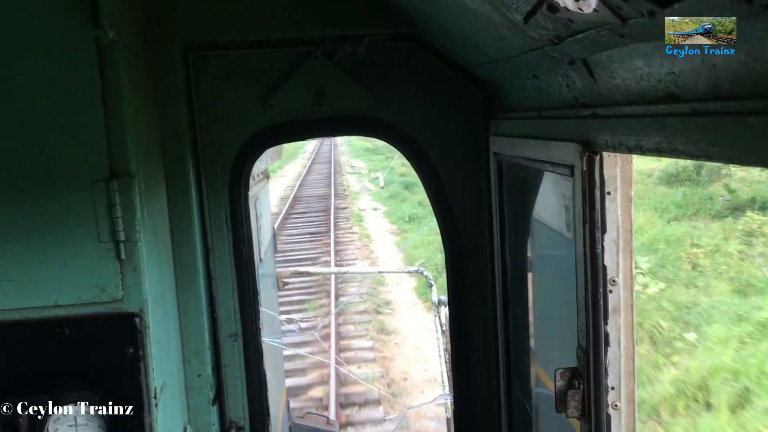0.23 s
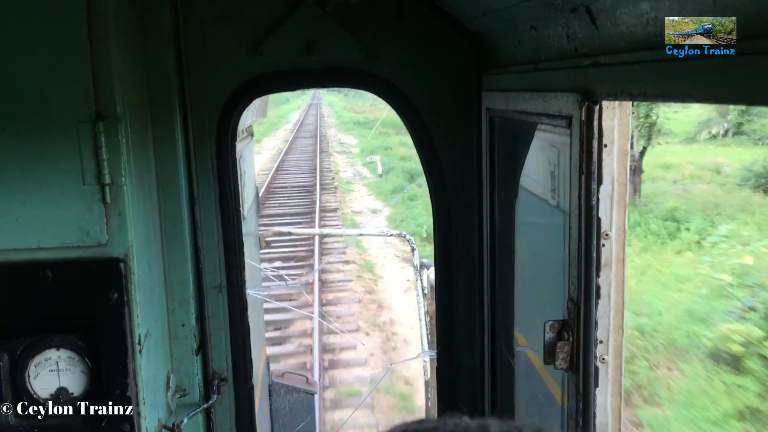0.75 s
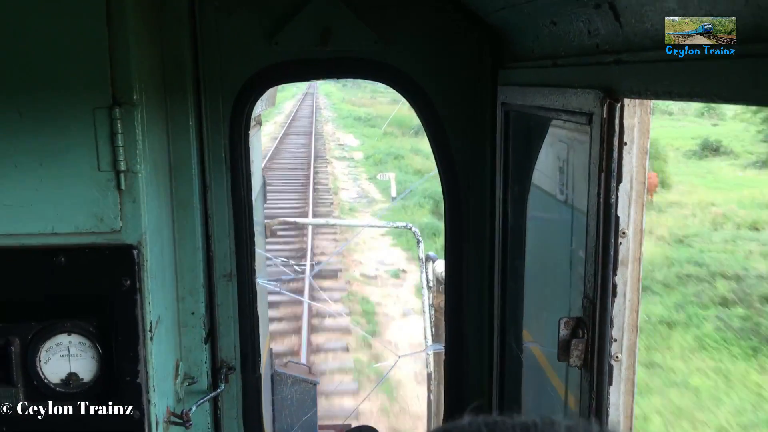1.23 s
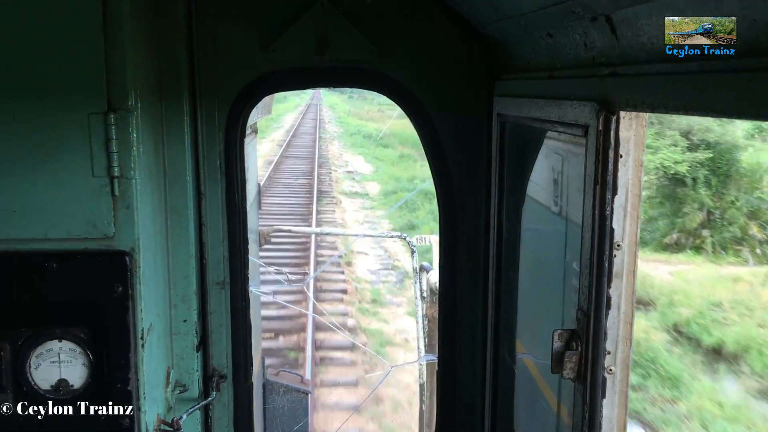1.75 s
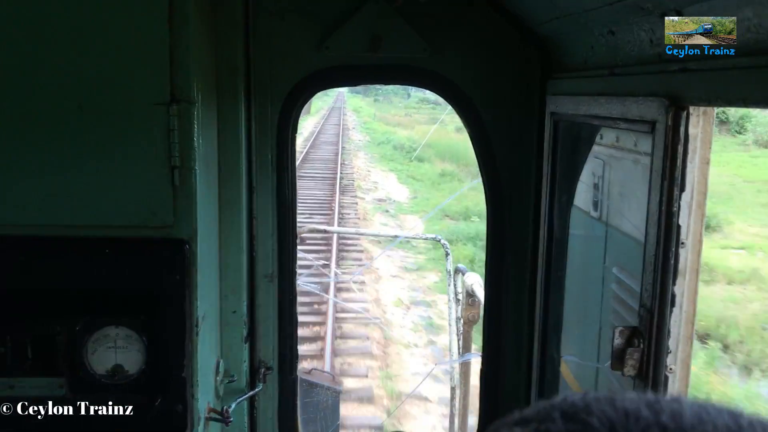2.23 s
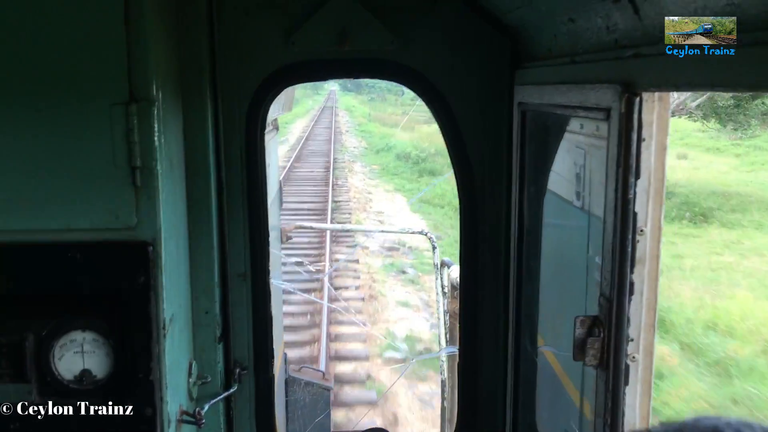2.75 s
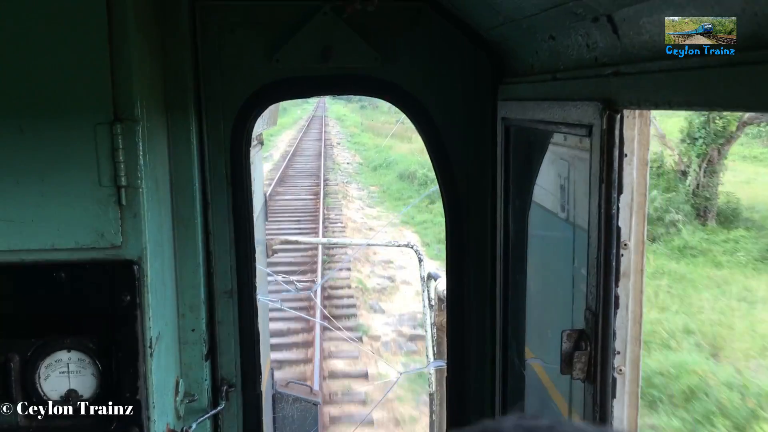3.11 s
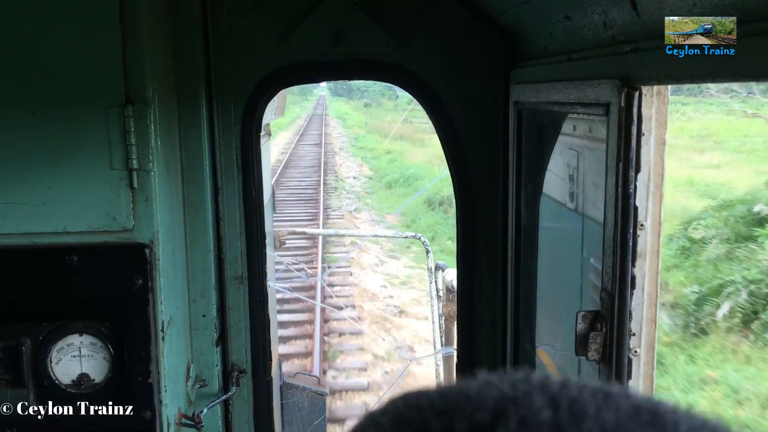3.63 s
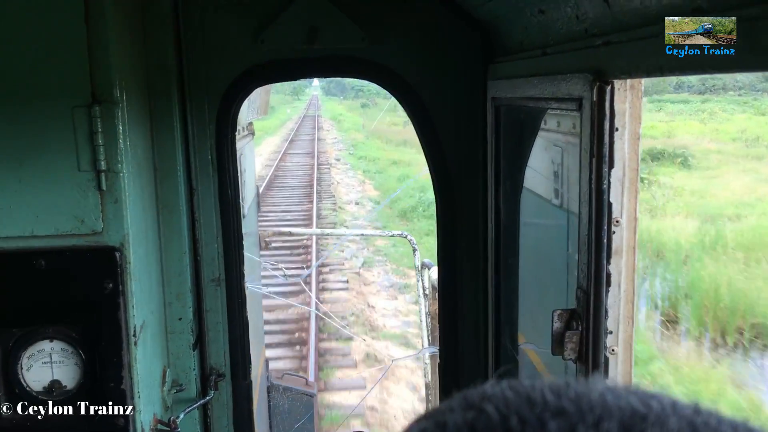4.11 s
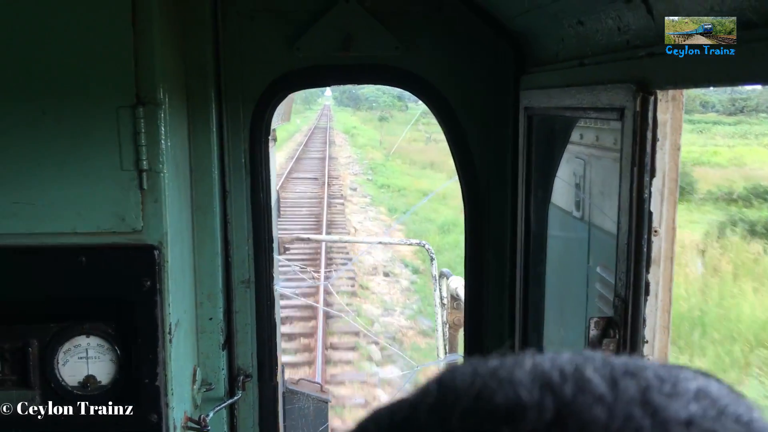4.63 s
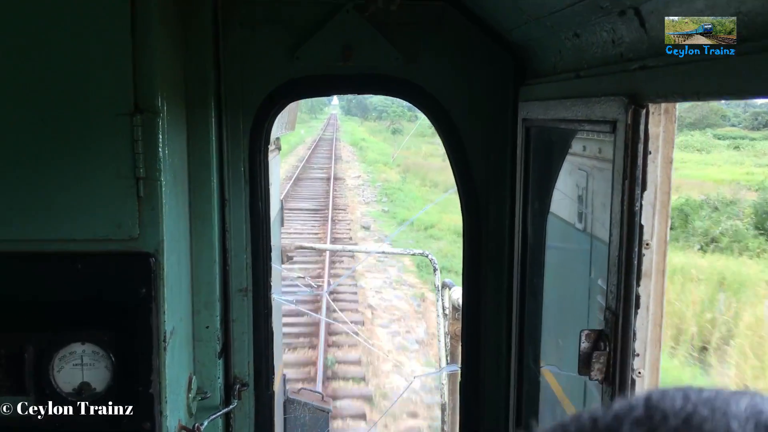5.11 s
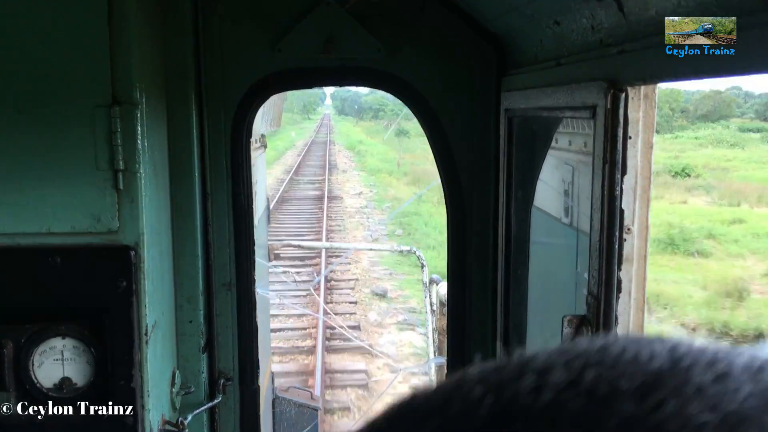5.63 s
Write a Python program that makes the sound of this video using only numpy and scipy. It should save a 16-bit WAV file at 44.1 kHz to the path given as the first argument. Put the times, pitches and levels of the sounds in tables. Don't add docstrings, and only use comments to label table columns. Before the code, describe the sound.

A continuous six-second ride inside the steel cab of a diesel-electric locomotive, heard close by with the door open. The engine holds a steady throttle, a deep throbbing drone with about ten pulses per second, mixed with a low alternator hum and thin, wavering gear whine. Under it lies a dense roar of air, rolling wheels and shaking steel, with a floor panel booming softly. Loose metal fittings jingle and rattle without pause, bright and dry, with sharper clinks scattered throughout, such as near 1.6, 3.3 and 4.0 seconds. Axles knock over rail joints in quick clusters of two or three around 0.4, 1.3, 2.2, 3.1, 3.9, 4.8 and 5.7 seconds, some with a short steely ring and, especially later, a dull floor thud. Small ticks from the cab body appear occasionally, clearest near 4.8 seconds. The speed stays constant and the sound ends mid-ride.

```python
import sys
import numpy as np
from scipy import signal
from scipy.fft import rfft, irfft
from scipy.io import wavfile
from scipy.ndimage import uniform_filter1d

SR = 44100
rng = np.random.default_rng(int(sys.argv[2]) if len(sys.argv) > 2 else 0)


def to_linear_factor(level_db):
    exponent = np.asarray(level_db, float) / 20
    return 10 ** exponent


def transcribe(signal):
    frames = np.atleast_2d(signal).T
    limited = np.clip(frames, -1, 1)
    pcm = np.round(limited * 32767).astype(np.int16)
    wavfile.write(sys.argv[1], SR, pcm)


N = 258426
T = np.arange(N) / SR
HZ = np.fft.rfftfreq(N, 1 / SR)
CRANK_HZ = 9.8811

THROB_DB = [-60, -44, -35.3, -33.8, -40.6, -31, -22.4, -38.2, -32.8, -64, -53, -49.5, -39, -52, -53, -56,
            -53, -52]
# (frequency [Hz], level of one order [dB rms])
CLATTER_COLOUR = [(200, -68.5), (350, -62), (450, -68), (600, -68), (800, -69), (1100, -79.5), (1600, -102)]
FLOOR_ORDERS = (3, 4, 6, 7, 16, 18, 20)
DOOR_ORDERS = (4, 5, 15)

# (multiple of its tone), (level [dB rms])
ALTERNATOR_MULTIPLES = (1, 2, 3, 5, 13, 16, 17, 18)
ALTERNATOR_DB = [-35.6, -34, -48.8, -53, -57, -62, -66, -64]
# (teeth met [per crank turn]), (level [dB rms])
GEAR_TEETH = (30, 39, 78, 79, 80, 81, 83, 113, 158, 218, 334)
GEAR_DB = [-53, -52.5, -63, -54, -62, -66, -64, -68, -59, -63, -70]
# (time [s], level [dB])
BLOWER_LOAD = [(0, -48.5), (.5, -46.5), (.9, -49.5), (1.75, -47.5), (2.2, -54), (2.75, -48.5), (3.6, -51.5),
               (4.3, -49), (4.85, -54.5), (5.25, -50.5), (5.86, -51)]

# (frequency [Hz], level [dB per Hz])
JINGLE_COLOUR = [(2000, -9), (3000, -8.5), (3400, -2.5), (4100, -11.5), (5350, -4), (6050, -4), (6700, 3),
                 (7500, -5.5), (9600, -0.5), (10550, -5), (11500, -3), (13200, -4.5), (14000, -8),
                 (15700, -12)]
# (frequency [Hz], width [Hz], level [dB])
FITTING_RINGS = [(5270, 1100, -7.5), (6680, 140, 0), (7950, 530, -3), (9540, 300, -0.5), (11350, 3100, -10)]
# (time [s], level [dB])
SHAKING = [(0.0, -46.5), (0.11, -45), (0.33, -45), (1.29, -44.5), (2.07, -46), (3.05, -45.5), (3.46, -43.5),
           (4.18, -44.5), (5.11, -44), (5.58, -46), (5.86, -43)]
# (time [s], peak [dB], lower rings relative to it [dB])
FITTING_HITS = [(0.041, -27.5, -19), (0.4071, -28, -13), (0.4788, -27.5, -13), (0.528, -25.5, -13),
                (0.6197, -28, -12), (0.9892, -29, -9), (1.0803, -29.5, -9), (1.509, -25.5, -14),
                (1.6003, -25, -9.5), (1.8083, -28.5, -8), (1.8941, -28, -16), (1.9765, -26, -12),
                (2.7357, -26, -11), (2.8792, -26.5, -12), (2.9895, -31, -9), (3.0612, -25, -15),
                (3.1403, -28, -13), (3.2799, -28, -17), (3.3398, -24, -12), (3.6007, -28, -18),
                (3.6603, -29, -15), (3.926, -26, -17), (4.0082, -25, -18), (4.2594, -32, -10),
                (4.4573, -25.5, -18), (4.6048, -27, -14), (4.789, -30, -19), (4.9871, -26, -13),
                (5.2347, -31, -12), (5.838, -29, -13)]

# (time [s], peak [dB], ring [Hz], ring relative to peak [dB], thud [dB])
WHEEL_KNOCKS = [(0.409, -32, 1043, -7, -37), (0.5003, -33, 934, -13, -40), (0.6, -36, 1220, -2, -46),
                (1.29, -34, 1150, -16, -29), (1.3994, -38, 1320, -10, -36), (2.171, -27, 1190, -9, -39),
                (2.2794, -34, 1166, -10, -44), (3.051, -26.5, 950, -6, -27), (3.153, -28.5, 1070, -9, -24),
                (3.256, -32, 1020, -4, -40), (3.9296, -28.5, 1352, -3.5, -23),
                (4.0329, -29.5, 990, -3, -22), (4.132, -33.5, 1315, -8, -31),
                (4.8146, -29.5, 1286, 4, -18.5), (4.9194, -36, 1010, -10, -40),
                (5.019, -34.5, 1000, -11, -31), (5.688, -30, 1304, -2, -19), (5.7894, -37, 1130, -12, -22)]
# (time [s], peak [dB])
BODY_TICKS = [
    (0.806, -35),
    (1.6194, -38),
    (2.9647, -36),
    (3.603, -36),
    (4.5803, -33),
    (4.6259, -33),
    (4.761, -26),
    (5.376, -32),
]

# (frequency [Hz], level [dB per Hz])
ROAR_COLOUR = [(15, -77), (30, -70), (44, -52), (90, -51), (130, -53), (200, -61), (340, -60), (450, -68.5),
               (600, -67), (900, -79), (1350, -79), (2000, -81.5), (2800, -88.5), (4200, -93.5)]
# (time [s], level [dB])
RAIL_ROUGHNESS = [(0.0, -36.5), (0.29, -37), (1.19, -36.5), (1.31, -35), (1.84, -36.5), (2.1, -36.5),
                  (2.84, -37.5), (3.2, -37), (3.53, -36.5), (3.88, -37), (4.49, -37.5), (4.78, -35.5),
                  (5.26, -37.5), (5.86, -37)]


def unit(x):
    return x / np.sqrt(np.mean(x ** 2))


def shape(x, gain):
    return irfft(rfft(x) * gain, N)


def noise():
    return rng.standard_normal(N)


def colour(points, hz=HZ + 1):
    at, db = np.transpose(points)
    return to_linear_factor(np.interp(np.log(hz), np.log(at), db, left=-200))


def bell(hz, width_hz):
    return 1 / np.sqrt(1 + (2 * (HZ - hz) / width_hz) ** 2)


def walk(rate):
    hold = int(SR / rate)
    steps = np.repeat(rng.standard_normal(N // hold + 1), hold)
    return unit(uniform_filter1d(uniform_filter1d(steps, hold), hold)[:N])


def curve(table):
    at, level = np.transpose(table)
    return np.interp(T, at, level)


def tone(angle, db, sway_db, slip, rate):
    level = np.sqrt(2) * to_linear_factor(db + sway_db * walk(rate))
    return level * np.cos(angle + slip * walk(rate))


def bursts(times, db, t60, rise):
    power = np.zeros(N)
    at = np.clip((np.asarray(times) * SR).astype(int), 0, N - 1)
    np.add.at(power, at, to_linear_factor(db) ** 2)
    power = signal.lfilter([1], [1, -np.exp(-2 * np.log(1000) / (t60 * SR))], power)
    soft = np.exp(-1 / (rise * SR))
    return np.sqrt(signal.lfilter([1 - soft], [1, -soft], power))


def add(out, s, blow):
    start = int(s * SR)
    out[start:start + len(blow)] += blow


def engine():
    wall_lag, floor_lead, door_lead = -2.64, 2.6, .85
    turn = 2 * np.pi * CRANK_HZ * T
    throb = np.zeros(N)
    for k, db in enumerate(THROB_DB, start=3):
        path = wall_lag + floor_lead * (k in FLOOR_ORDERS) + door_lead * (k in DOOR_ORDERS)
        throb += tone(k * (turn + np.pi) + path, db, .4, .05, 4)

    orders = np.arange(21, 160)
    one_turn = np.arange(4096) / 4096
    chance = to_linear_factor(2.5 * rng.standard_normal(len(orders)))
    size = np.sqrt(2) * colour(CLATTER_COLOUR, orders * CRANK_HZ) * chance
    phase = rng.random((len(orders), 1))
    pattern = size @ np.cos(2 * np.pi * (orders[:, None] * one_turn + phase))
    place = CRANK_HZ * T + 0.0016 * walk(3.035)
    return throb + np.interp(place % 1, one_turn, pattern, period=1)


def whines():
    alternator_hz, motor_hz, blower_teeth = 58.54, 92.82, 138
    turn = 2 * np.pi * T
    out = tone(turn * blower_teeth * CRANK_HZ, curve(BLOWER_LOAD), 0.93, 0.36, 14)
    out += tone(turn * motor_hz, -45.5, 1.9, 0.17, 3.3)
    for k, db in zip(ALTERNATOR_MULTIPLES, ALTERNATOR_DB):
        out += tone(turn * k * alternator_hz - .6, db, .3 + .15 * k, .06 * k, 8)
    for k, db in zip(GEAR_TEETH, GEAR_DB):
        out += tone(turn * k * CRANK_HZ, db, 1.5, .1 + 3e-5 * k ** 2, 18)
    return out


def rattle(shake_db):
    beat_s = 1 / (5.55 * CRANK_HZ)
    wheel_hz, wheel_lag, wheel_db = 2.92, 3.0, 1.5
    hits = np.transpose(FITTING_HITS) + np.array([[0], [3], [0]])
    rebounds = hits + np.array([[beat_s], [-10], [0]])
    marks = np.concatenate([[0], hits[0], [T[-1]]])
    count = np.cumsum(np.append(0, np.round(np.diff(marks) / beat_s)))
    s = np.interp(np.setdiff1d(np.arange(count[-1]), count), count, marks)

    chance = rng.random((400, 3))[:len(s)].T
    db = shake_db[(s * SR).astype(int)] + 18 - 9 * chance[0]
    db += wheel_db * np.cos(2 * np.pi * wheel_hz * s - wheel_lag)
    s = s + .002 * (2 * chance[1] - 1)
    low_db = -12 + 6.6 * (chance[2] - .5)
    return np.hstack([[s, db, low_db], hits, rebounds])


def fittings():
    out, colours = np.zeros(N), colour(JINGLE_COLOUR)
    small_s = rng.random(900) * N / SR
    shake_db = curve(SHAKING)
    s, hit_db, low_db = rattle(shake_db)
    small_db = shake_db[(small_s * SR).astype(int)] + 6.8 * rng.random(len(small_s))

    # gain, centre (Hz), time to die away (s)
    parts = []
    for hz in range(2500, 16000, 1000):
        band = np.cos(np.pi * np.clip((HZ - hz) / 2000, -.5, .5))
        parts.append((colours * band, hz, .019))
    for hz, width, db in FITTING_RINGS:
        parts.append((to_linear_factor(db + 2.5) * bell(hz, width) ** 2, hz, .04))
    scale = to_linear_factor(0.67) / np.sqrt(np.mean(colours ** 2))

    for gain, hz, t60 in parts:
        reach_db = -6.0 * (hz > 13600) - 2.9 * (hz < 4800)
        big = hit_db + (hz < 8500) * (low_db + 8) - 2.0 - 14.4 * rng.random(len(s))
        small = small_db - 10.5 * rng.random(len(small_s))
        blows = bursts(np.append(s, small_s), np.append(big, small) + reach_db, t60, .002)
        hiss = to_linear_factor(shake_db - 6)
        out += np.sqrt(hiss ** 2 + blows ** 2) * shape(noise(), scale * gain)
    return out


def track():
    out, t = np.zeros(N + SR), T[:SR // 4]
    resonances = bell(1100, 1700) ** 2 + to_linear_factor(-19) * bell(2800, 2500) ** 2
    steel = shape(noise(), resonances * np.clip(HZ / 400, 0, 1) ** 2)
    steel = np.resize(unit(steel) * to_linear_factor(2.2 * walk(140)), N + SR)
    tail = to_linear_factor(-5.5) * np.exp(-np.log(1000) * t / 0.27) + to_linear_factor(-11) * np.exp(-t / .006)
    onset = 1 - np.exp(-t / .002)
    for s, db, ring_hz, ring_db, _ in WHEEL_KNOCKS:
        crack = steel[int(s * SR):][:len(t)] * tail * onset * to_linear_factor(1 - .1 * (ring_db + 8))
        swell = t / 0.0095 * np.exp(1 - t / 0.0081)
        ring = to_linear_factor(ring_db) * np.sin(2 * np.pi * ring_hz * t) * swell
        add(out, s, to_linear_factor(db - 6.0) * (crack + ring))

    push = t / 0.00096
    tick = np.sin(2 * np.pi * 1230 * t) * push ** 2 * np.exp(2 - 2 * push)
    for s, db in BODY_TICKS:
        add(out, s, to_linear_factor(db) * tick)

    s, thud_db = np.transpose(WHEEL_KNOCKS)[[0, 4]]
    floor = unit(shape(noise(), bell(310, 130) ** 2))
    return out[:N] + bursts(s, thud_db - 9.0, 0.13, .007) * floor


def roar():
    out, shared = np.zeros(N), walk(22.03)
    rail = curve(RAIL_ROUGHNESS)
    swell = rail - np.mean(rail)
    boom = 3.9 * swell + 1.63 * walk(14)
    pump = .8 * np.cos(2 * np.pi * (CRANK_HZ * T - .25))
    for hz in 15.5 * 2 ** np.arange(0, 9.1, .5):
        octaves = np.log2((HZ + 1) / hz)
        band = np.cos(np.pi * np.clip(octaves, -.5, .5)) * colour(ROAR_COLOUR)
        slow = boom if 230 < hz < 420 else swell
        flicker = 0.9 * slow + 0.52 * shared + walk(12) + pump * (hz < 1300)
        db = np.clip(hz / 400, 0, 1) * flicker
        out += to_linear_factor(db) * shape(noise(), band * np.sqrt(SR / 2))
    return out


def scene():
    return (engine() + whines() + fittings() + track() + roar())[None]


def top_cut(x):
    return signal.sosfilt(signal.butter(12, 15730, fs=SR, output="sos"), x)


def record(dry):
    mix = shape(dry, HZ < 15800)
    return top_cut(mix)


dry = scene()
out = record(dry)
transcribe(out)
```